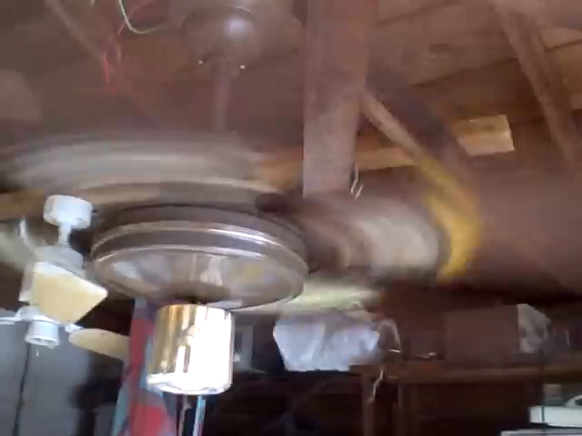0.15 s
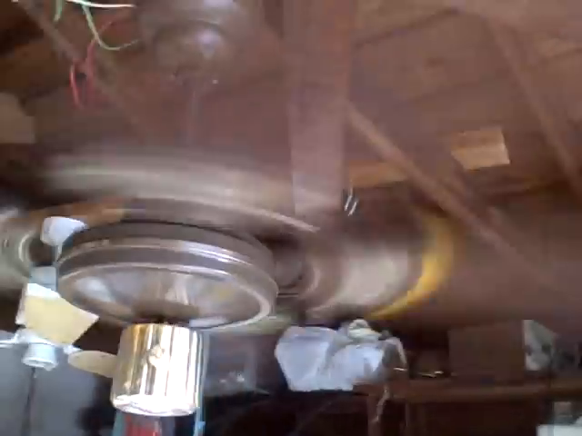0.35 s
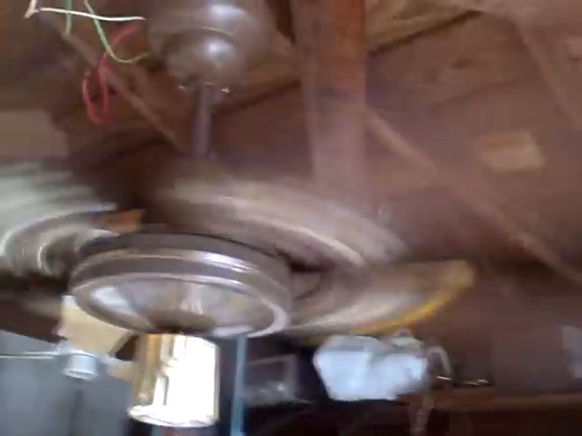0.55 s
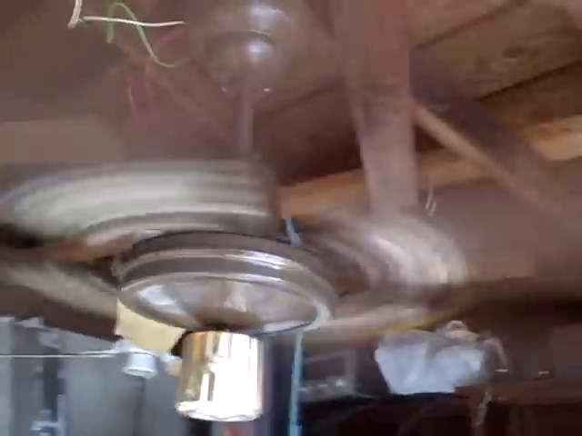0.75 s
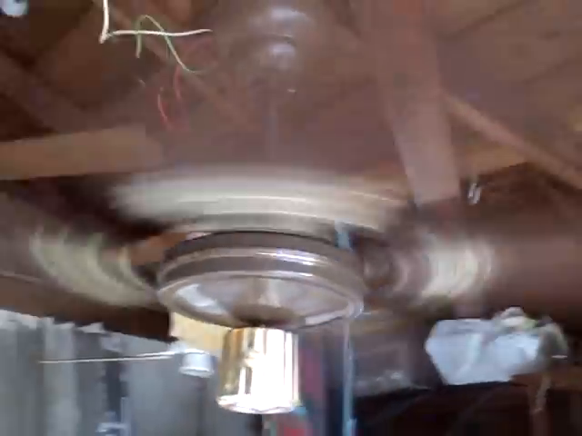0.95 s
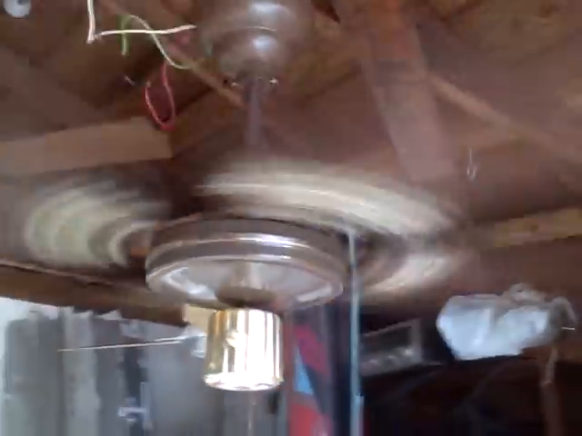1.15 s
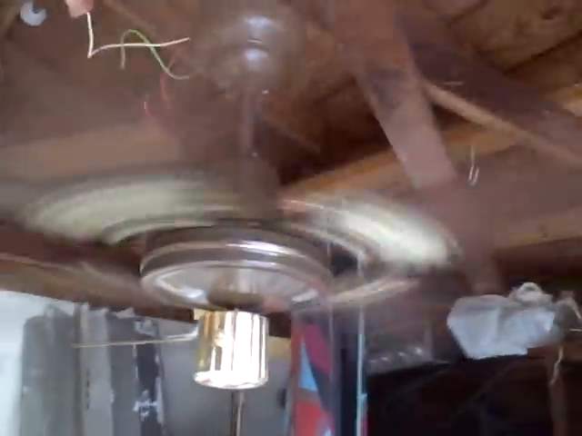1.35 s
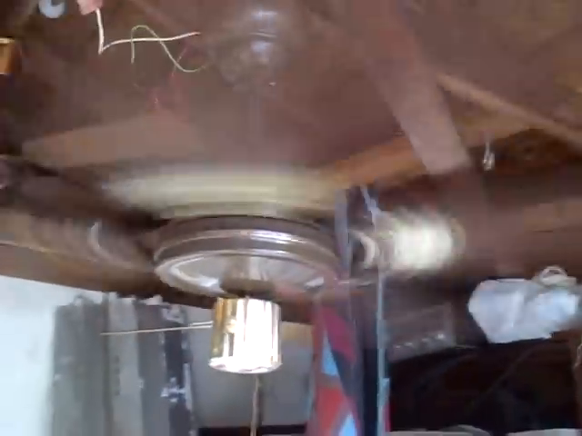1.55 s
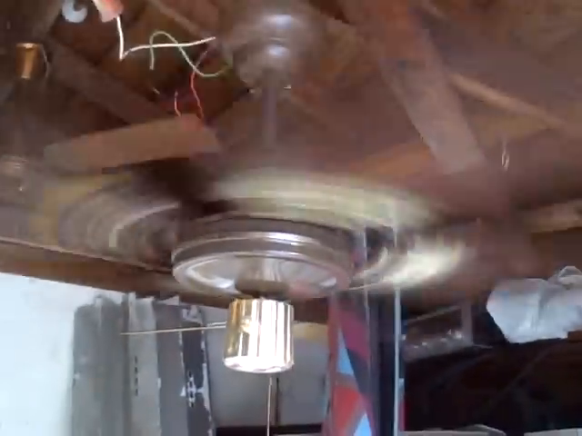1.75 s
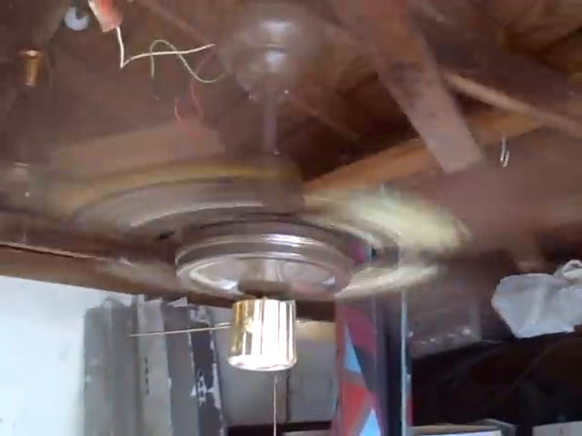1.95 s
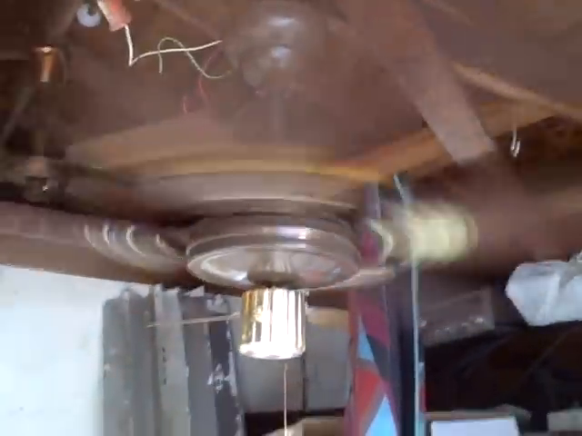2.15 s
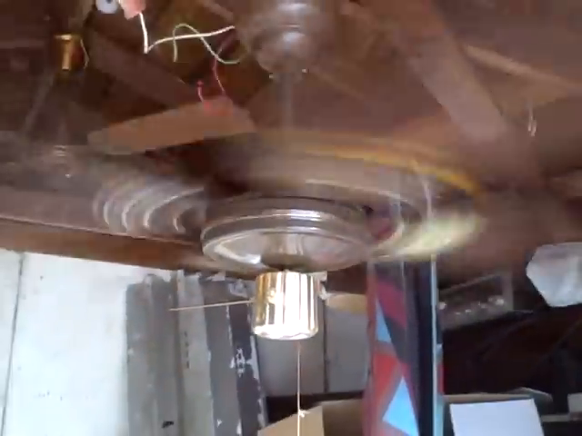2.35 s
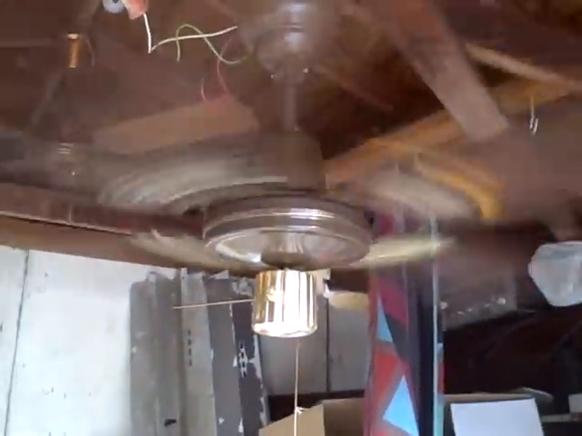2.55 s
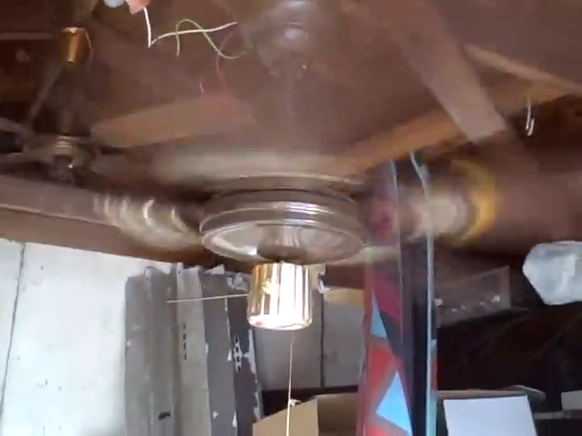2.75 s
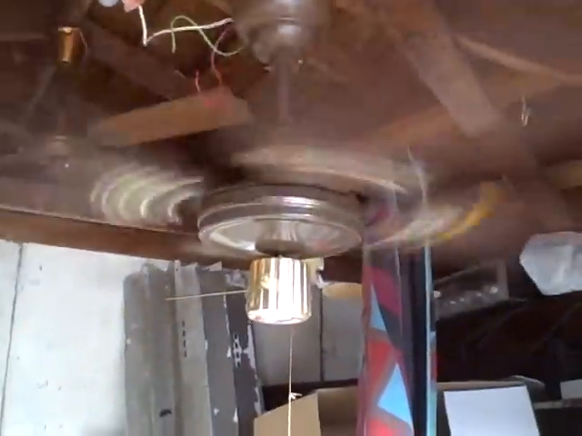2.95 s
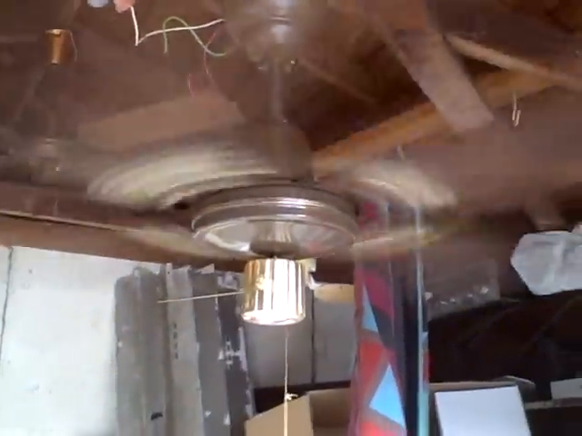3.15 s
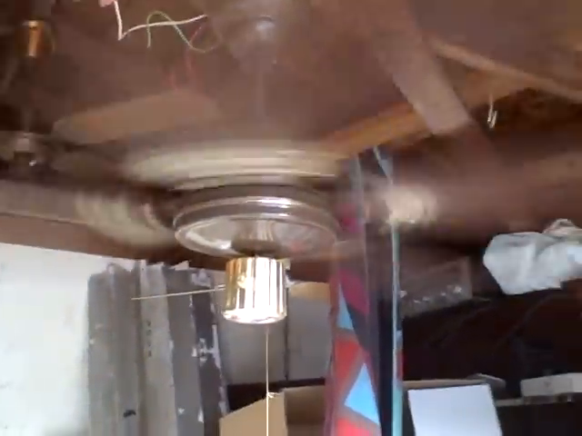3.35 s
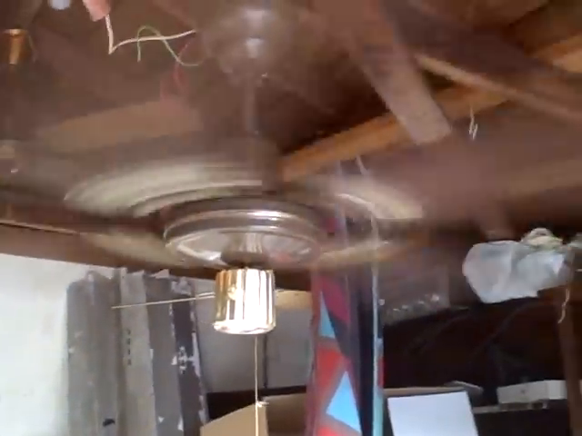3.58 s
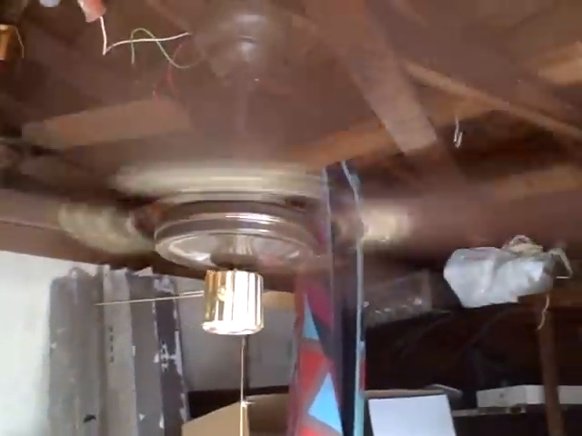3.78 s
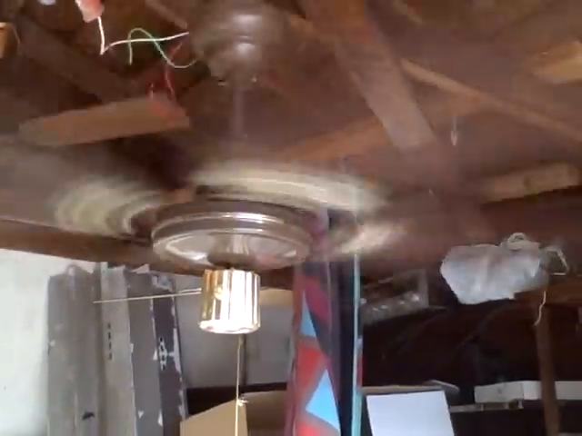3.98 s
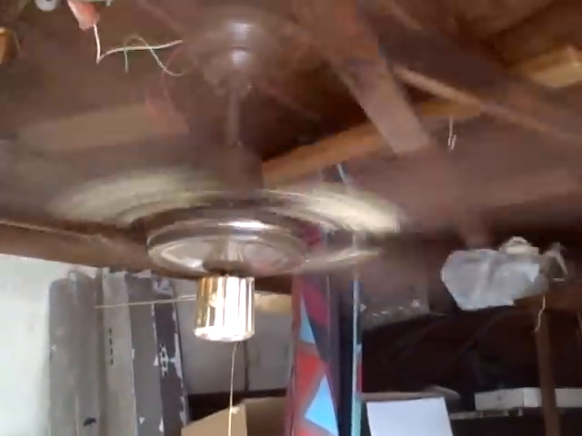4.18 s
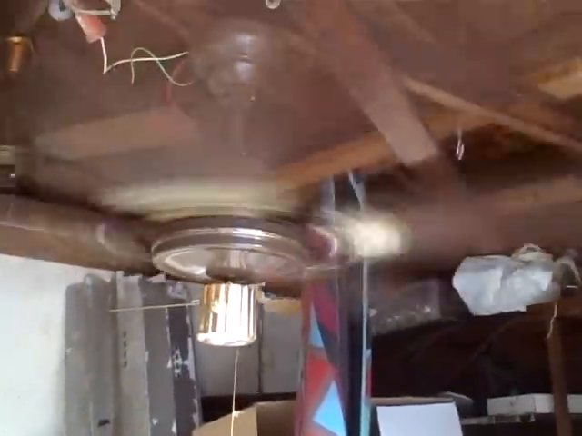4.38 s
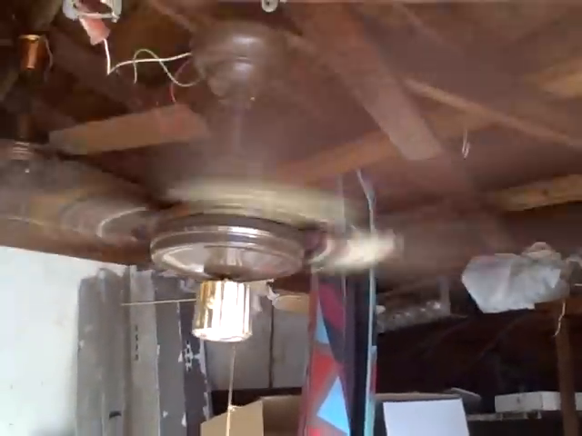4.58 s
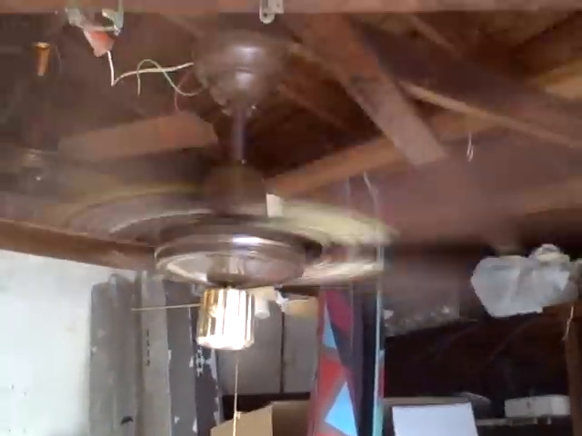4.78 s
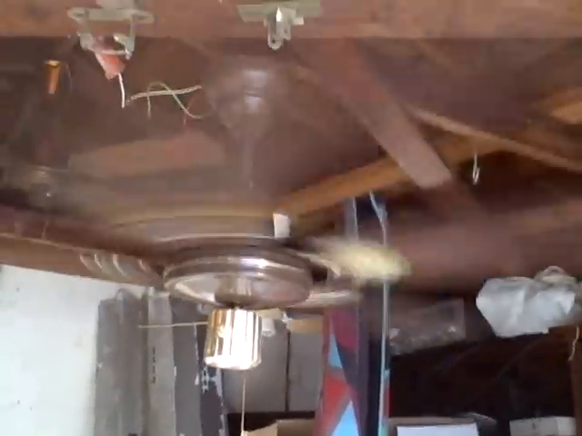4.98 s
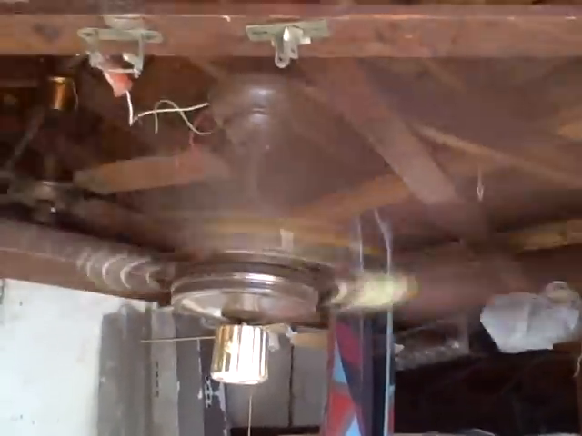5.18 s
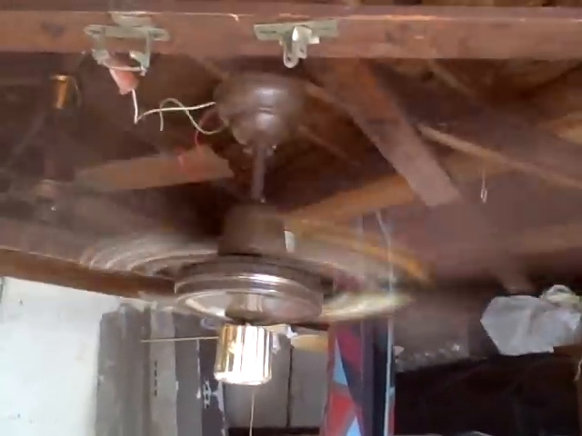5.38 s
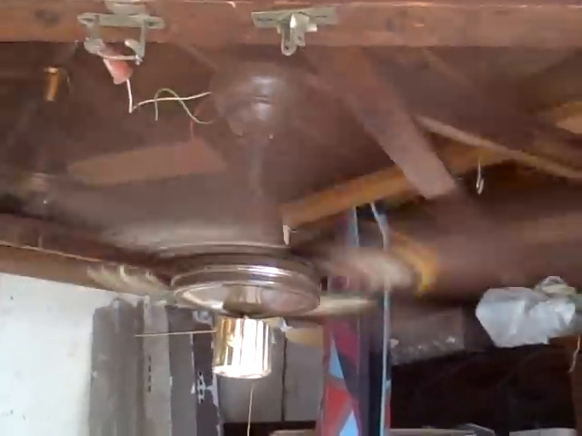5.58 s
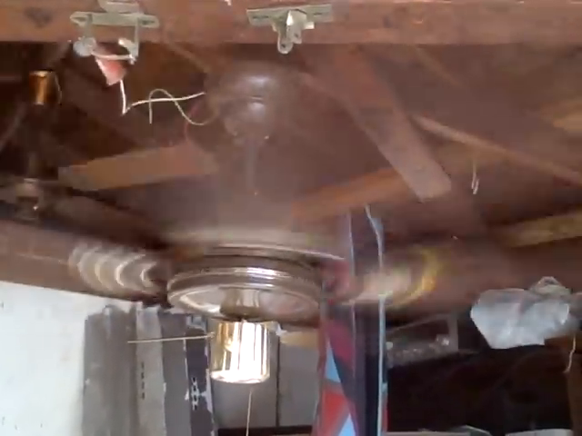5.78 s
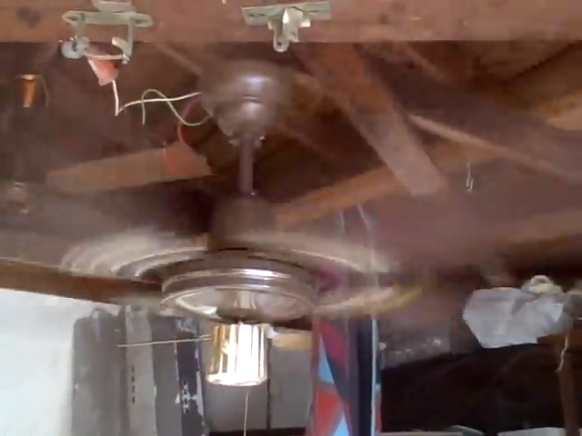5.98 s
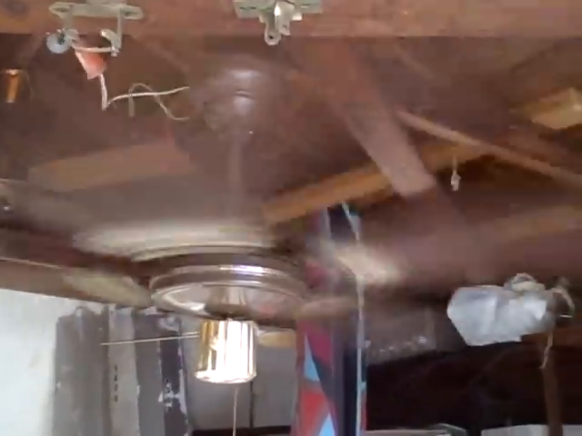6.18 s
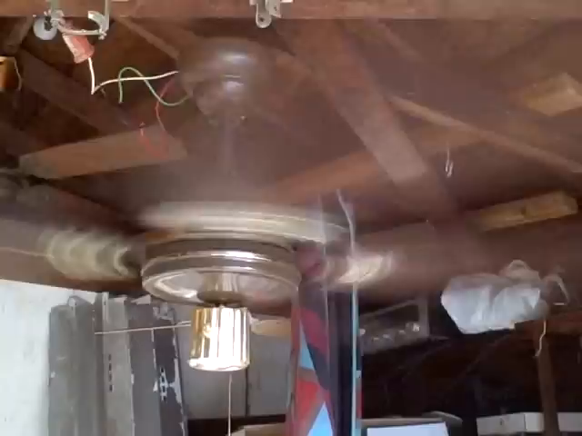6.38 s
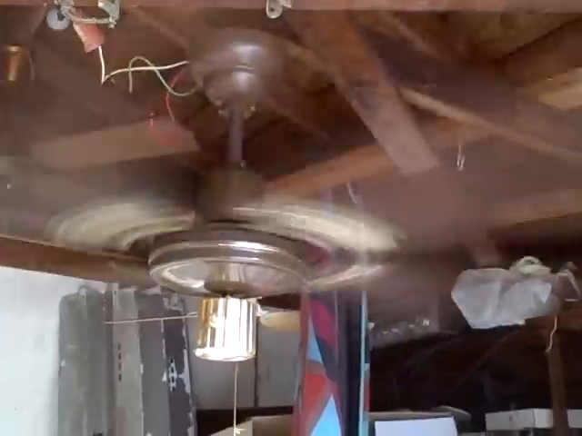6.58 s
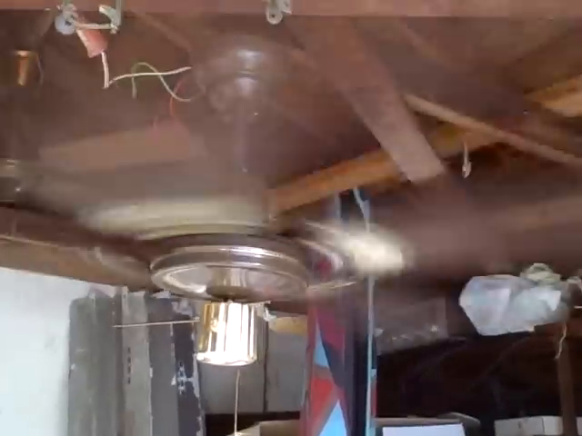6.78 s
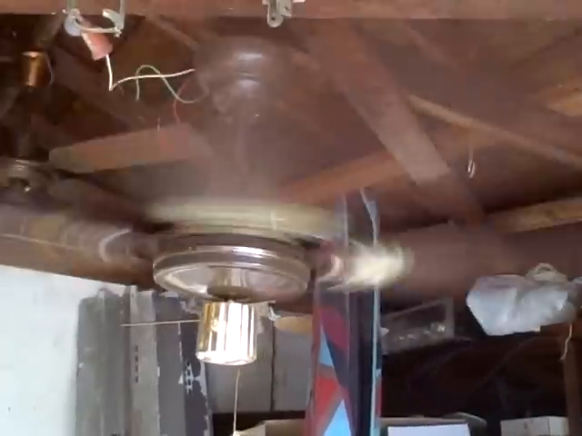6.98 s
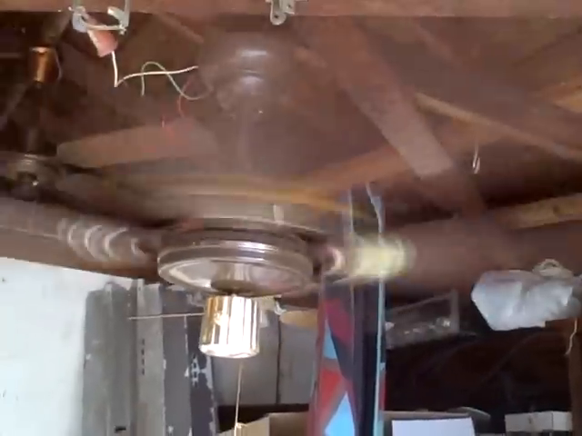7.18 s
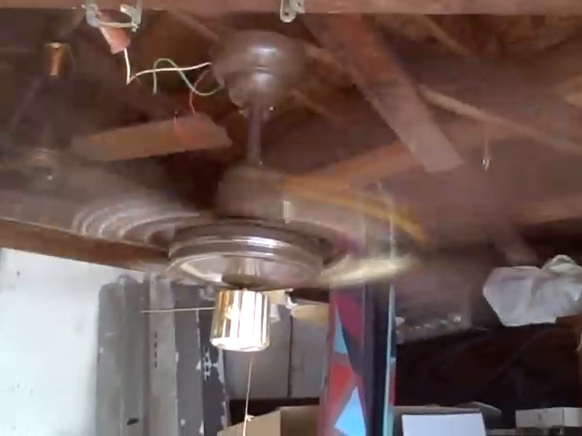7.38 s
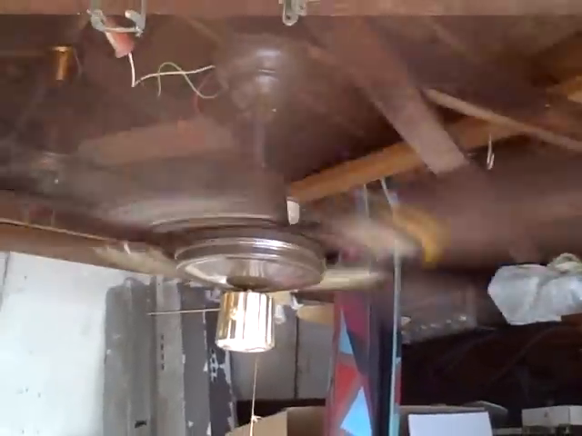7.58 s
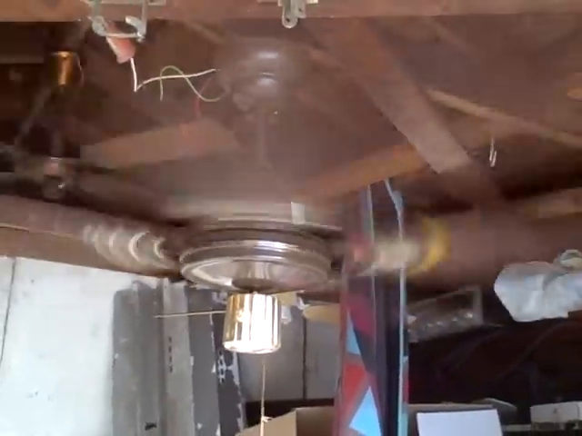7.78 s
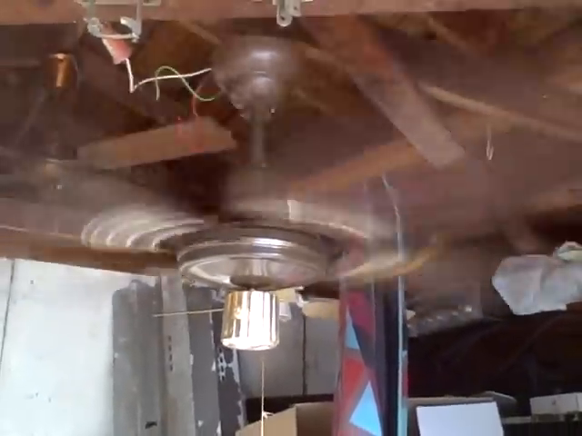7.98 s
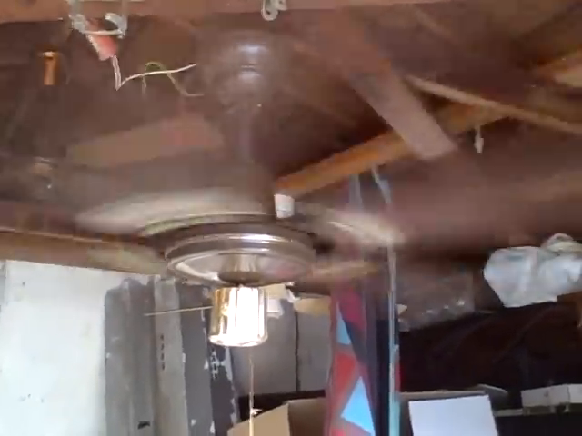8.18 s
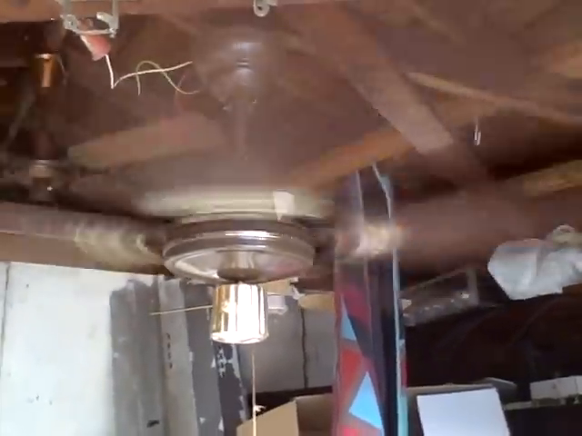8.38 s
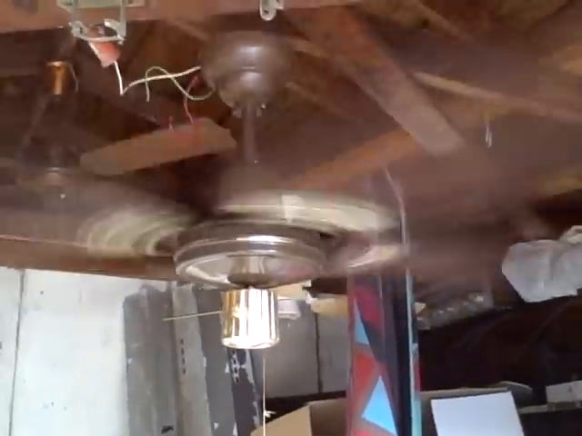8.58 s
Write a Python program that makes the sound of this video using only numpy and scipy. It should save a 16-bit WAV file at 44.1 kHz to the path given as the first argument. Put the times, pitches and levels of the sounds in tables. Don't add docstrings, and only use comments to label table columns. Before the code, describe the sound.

A four-blade ceiling fan runs at steady high speed in a wooden storage room. Close to the microphone, its blades beat the air in rapid low thumps, about eighteen a second. As the microphone backs away the fluttering weakens, leaving rumbling, whooshing air, soft hiss and faint motor hum. Fingers rustle on the device midway, then one thin squeak is heard.

```python
import sys
import numpy as np
from scipy import signal
from scipy.fft import rfft, irfft
from scipy.io import wavfile
from scipy.ndimage import uniform_filter1d

SR = 44100
rng = np.random.default_rng(int(sys.argv[2]) if len(sys.argv) > 2 else 0)


def volts_from_db(level):
    exponent = np.asarray(level, float) / 20
    return 10 ** exponent


def transcribe(u):
    v = np.clip(np.atleast_2d(u).T, -1, 1)
    q = np.round(v * 32767).astype(np.int16)
    wavfile.write(sys.argv[1], SR, q)


N = 381024
TIME_S = np.arange(N) / SR
FREQ_HZ = np.fft.rfftfreq(N, 1 / SR)


def evened(x):
    return x / np.sqrt(np.mean(x ** 2) + 1e-20)


def spectrum(points, hz):
    f, value = np.transpose(points)
    return np.interp(np.log(hz + 1), np.log(f + 1), value)


def curve(rows):
    s, value = np.transpose(rows)
    return np.interp(TIME_S, s, value)


def noise(gain):
    return evened(irfft(gain * rfft(rng.standard_normal(N)), N))


def wander(hz):
    return noise((FREQ_HZ > 1) / (1 + (FREQ_HZ / hz) ** 4))


def resonance(hz, centre_hz, width_hz):
    return 1 / (1 + (2 * (hz - centre_hz) / width_hz) ** 2)


BLADES_PER_S = 18.35
# (time [s], lead [blade passages])
DRIFT = [(0.0, -0.475), (0.72, -0.411), (1.44, -0.357), (2.16, -0.362), (2.88, -0.41), (3.6, -0.398),
         (4.32, -0.4), (5.04, -0.415), (5.76, -0.442), (6.48, -0.479), (7.2, -0.515), (7.92, -0.513),
         (8.64, -0.557)]


def blade_count():
    return BLADES_PER_S * TIME_S + curve(DRIFT)


# (time [s], blade dip level [dB])
CLOSENESS = [(0, -23), (.3, -21), (.5, -23.5), (.9, -23.5), (1.3, -24.5), (1.7, -30.5), (2.1, -30),
             (2.6, -35.5), (3.2, -35.5), (3.9, -33.5), (4.3, -32.5), (4.9, -39), (5.6, -36), (6.3, -32),
             (6.9, -34.5), (7.4, -38.5), (8.1, -36), (8.64, -37)]
FAR_DB, NEAR_DB = -35, -20.5


def nearness():
    return np.clip((curve(CLOSENESS) - FAR_DB) / (NEAR_DB - FAR_DB), -.3, 1.3)


def levels(layers, wander_hz):
    near = nearness()
    return [far_db + gain_db * near + wander_db * wander(wander_hz)
            for far_db, gain_db, wander_db in layers]


UNEVEN_DB = [.3, 2.5, -.6, -2.4]
# (frequency [Hz], level [dB per Hz])
WAKE = [(60, -28), (150, 1.5), (500, -0.5), (1000, -10), (1700, -22.5), (2600, -24.5), (4000, -49)]
SWIRL_DB = -9


def blades():
    near = np.clip(nearness(), 0, 1)
    count = blade_count()
    blade = np.round(count).astype(int) + 1
    luck = rng.standard_normal((blade.max() + 1, 4))
    place = count + 1 - blade - .015 * luck[blade, 0]
    width = (0.1 + 0.01 * near) * volts_from_db(0.72 * luck[blade, 1])
    width = width * (1 + .25 * np.sign(place))
    depth_db = .9 * luck[blade, 2] + np.take(UNEVEN_DB, (blade - 1) % 4)
    suction = volts_from_db(depth_db) * np.exp(-.5 * (place / width) ** 2)
    refill = near * 0.17 * ((place + 0.074) % 1)
    pressure = refill - suction
    dip = evened(uniform_filter1d(pressure - pressure.mean(), size=250))
    puff = volts_from_db(depth_db + 2.1 * luck[blade, 3]) * np.exp(-.5 * ((place + 0.041) / 0.096) ** 2)
    swirl = volts_from_db(SWIRL_DB) * puff * noise(volts_from_db(spectrum(WAKE, FREQ_HZ)))
    return volts_from_db(curve(CLOSENESS)) * (dip + swirl)


# (frequency [Hz], level [dB per Hz])
COLOUR = [(6, -17), (25, -9.5), (55, -3.5), (85, -12.5), (140, -13.5), (230, -18.5), (370, -24), (600, -17),
          (900, -26.5), (1370, -32.5), (3400, -39.5), (5000, -37), (7400, -37.5), (8000, -45)]
# (frequency [Hz], width [Hz], boost [dB])
RINGS = [(116, 21, 4.5), (443.6, 71, 7), (513, 56, 3.5), (778, 130, 2.5), (2490, 360, 1.5),
         (6470, 1600, 7.5)]
# (far level [dB], gain when near [dB], slow wander [dB])
AIR_LAYERS = [(-37.5, 4.5, .7), (-39.5, 2.5, 0.34), (-45.5, 1.7, 0.13)]


def air():
    colour_db = spectrum(COLOUR, FREQ_HZ)
    for hz, width_hz, boost_db in RINGS:
        colour_db = colour_db + boost_db * resonance(FREQ_HZ, hz, width_hz)
    above_low = 1 / (1 + (270 / (FREQ_HZ + 1)) ** 6)
    above_mid = 1 / (1 + (1500 / (FREQ_HZ + 1)) ** 6)
    shares = [1 - above_low, above_low - above_mid, above_mid]
    near, count, gust = np.clip(nearness(), 0, 1), blade_count(), wander(13.5)
    uneven_db = np.take(UNEVEN_DB, np.round(count).astype(int) % 4)
    uneven_db = uniform_filter1d(uneven_db, size=800)
    # (far throb [dB], near throb [dB], lag [blade passages], shared gust [dB], own flicker [dB])
    habits = [(0.7, 1.5, -0.15, 0.35, 0.43), (0.47, 1.6, -0.22, 0.35, 0.82), (0.76, 1.24, .04, 0.44, 0.25)]
    out = np.zeros(N)
    for share, level_db, habit in zip(shares, levels(AIR_LAYERS, 3.2), habits):
        far_db, near_db, lag, gust_db, own_db = habit
        throb_db = (far_db + near * (near_db - far_db)) * np.cos(2 * np.pi * (count - lag))
        flicker_db = gust_db * gust + own_db * wander(25)
        swing = evened(volts_from_db(throb_db + 0.19 * uneven_db + flicker_db))
        out += volts_from_db(level_db) * swing * noise(volts_from_db(colour_db) * np.sqrt(abs(share)))
    return out


# (frequency [Hz], width [Hz], trim [dB])
WHINE = [(521.5, 36, -5), (2055, 113, 0)]
# (far level [dB], gain when near [dB], slow wander [dB])
MOTOR_NOTES = [(-43, 3, 1.6), (-59, 4, .8)]


def whine():
    throb_db = 0.7 * np.cos(2 * np.pi * blade_count())
    out = np.zeros(N)
    for (hz, width_hz, trim_db), level_db in zip(WHINE, levels(MOTOR_NOTES, 3.5)):
        out += volts_from_db(level_db + trim_db + throb_db) * noise(resonance(FREQ_HZ, hz, width_hz))
    return out


# (frequency [Hz], level [dB])
TONES = [(119.8, -58), (7481.4, -78), (7539.3, -79), (7598.2, -71), (7656.5, -71), (7714.3, -80)]


def tones():
    out = np.zeros(N)
    for hz, level_db in TONES:
        sine = np.sin(2 * np.pi * (hz * TIME_S + rng.random()))
        out += np.sqrt(2) * volts_from_db(level_db + wander(1.3)) * sine
    return out


# (frequency [Hz], level [dB per Hz])
RUSTLE_COLOUR = [(800, -40), (1500, -12), (4200, -11.5), (4800, -8), (5200, -1.5), (5700, -4.5), (6500, -2),
                 (7400, -4), (8000, -27)]
# (time [s], rise [s], fall [s], level [dB])
RUSTLES = [(.884, 0.0018, 0.012, -43), (3.95, 0.011, .02, -46), (4.275, .008, .015, -42),
           (4.295, .01, 0.034, -38.5), (4.35, .002, 0.011, -41), (4.37, .006, 0.01, -39.5),
           (4.388, .006, 0.02, -40), (4.419, 0.0022, 0.034, -39.5), (4.49, .002, 0.009, -41),
           (4.508, 0.0074, 0.011, -39), (4.522, .006, 0.016, -41.5), (4.6, .008, .015, -49),
           (5.53, .01, .02, -47), (5.58, .006, .01, -55), (6.44, .01, .02, -57), (6.882, .001, .004, -43),
           (7.21, .01, .02, -47)]


def rustle():
    stroke = np.zeros(N)
    for s, rise_s, fall_s, level_db in RUSTLES:
        late = TIME_S - s
        stroke += volts_from_db(level_db) * np.exp(-(late / np.where(late < 0, rise_s, fall_s)) ** 2)
    grain = volts_from_db(3 * wander(500))
    hiss = noise(volts_from_db(spectrum(RUSTLE_COLOUR, FREQ_HZ)))
    return stroke * evened(grain * hiss)


SQUEAK_S, SQUEAK_HZ, SQUEAK_DB = 5.462, 5800, -48
SAG_HZ_PER_S, SWELL_DB_PER_S, FADE_DB_PER_S = 800, 110, 120


def squeak():
    late = TIME_S - SQUEAK_S
    level_db = SQUEAK_DB + np.where(late < 0, SWELL_DB_PER_S, -FADE_DB_PER_S) * late
    hz = SQUEAK_HZ - SAG_HZ_PER_S * np.clip(late, -.5, .5) + 45 * wander(90)
    turns = np.cumsum(hz) / SR
    return np.sqrt(2) * volts_from_db(level_db + 3 * wander(60)) * np.sin(2 * np.pi * turns)


def scene():
    return (blades() + air() + whine() + tones() + rustle() + squeak())[None]


def roll_off(x):
    return signal.sosfilt(signal.butter(12, 15600, fs=SR, output="sos"), x)


RATE_HZ = 16000
# (frequency [Hz], gain [dB])
MIRROR = [(8000, 0.5), (8400, -2.5), (9500, -9), (10500, -16), (11500, -23), (13000, -35), (14000, -41),
          (15000, -49), (15500, -66), (16000, -110)]


def record(dry):
    both_ways = np.concatenate([dry[0], dry[0, ::-1]])
    hz, z = np.fft.rfftfreq(2 * N, 1 / SR), rfft(both_ways)
    top = round(RATE_HZ * 2 * N / SR)
    half = top // 2
    z[half:] = 0
    image = np.conj(z[half - 1::-1])
    z[half + 1:top + 1] = image * volts_from_db(spectrum(MIRROR, hz[half + 1:top + 1]))
    return roll_off(irfft(z, 2 * N)[None, :N])


dry = scene()
out = record(dry)
transcribe(out)
```